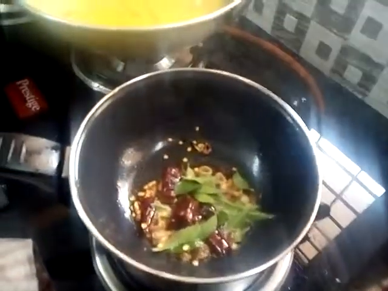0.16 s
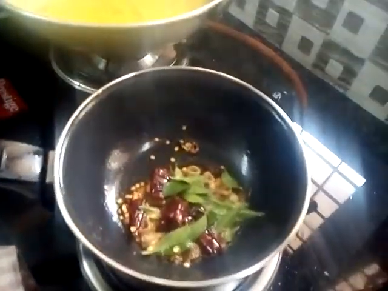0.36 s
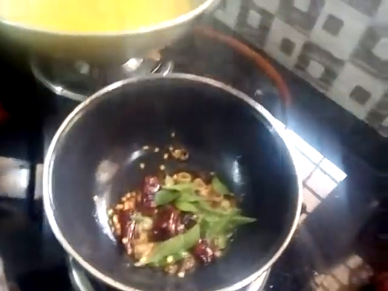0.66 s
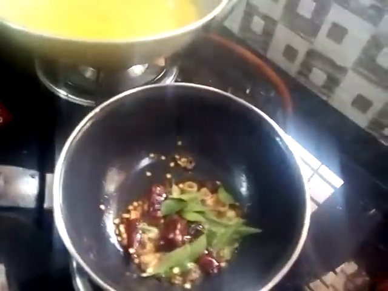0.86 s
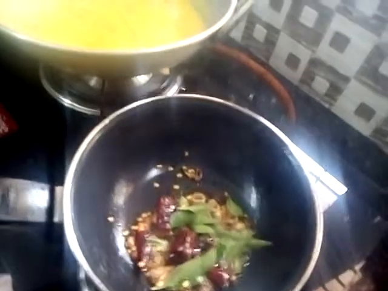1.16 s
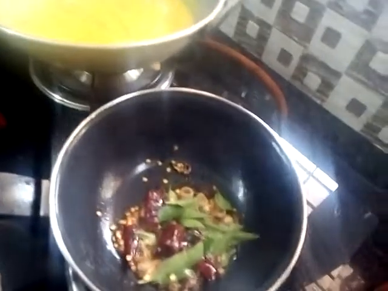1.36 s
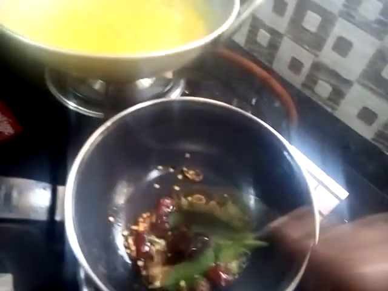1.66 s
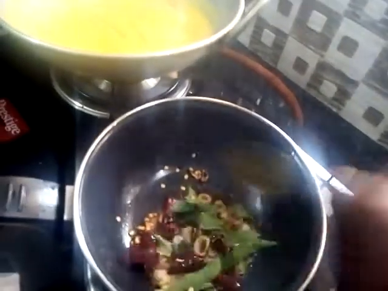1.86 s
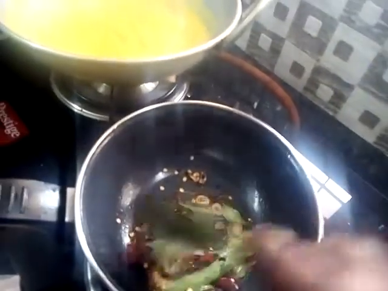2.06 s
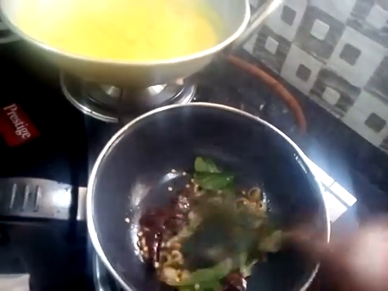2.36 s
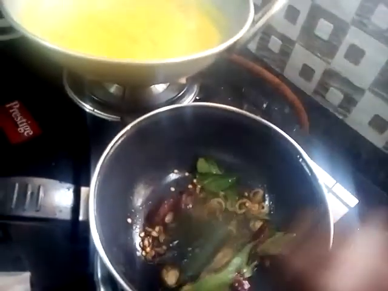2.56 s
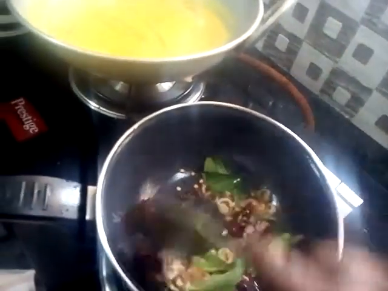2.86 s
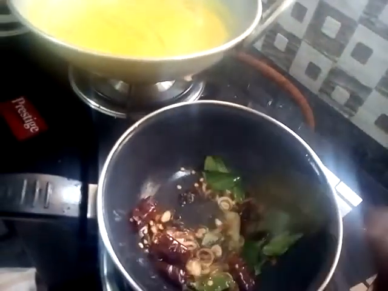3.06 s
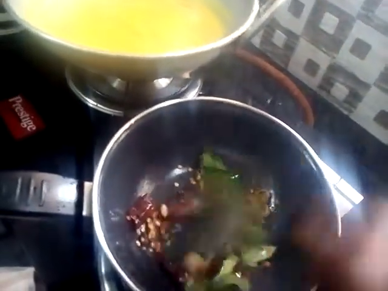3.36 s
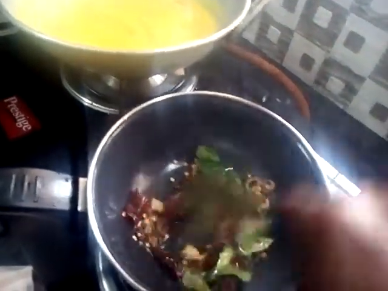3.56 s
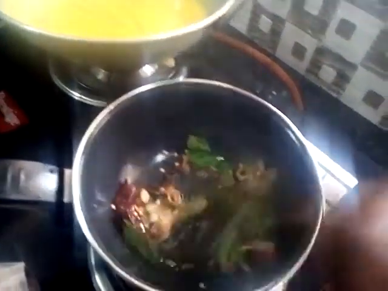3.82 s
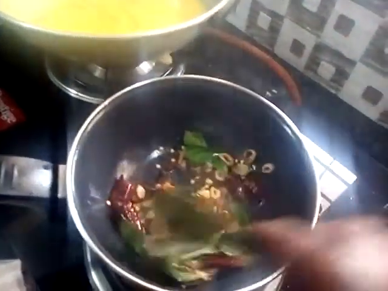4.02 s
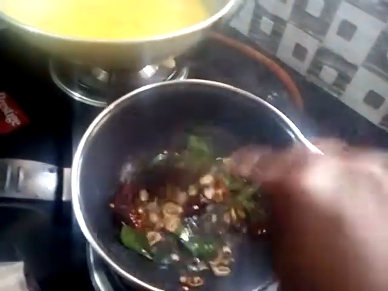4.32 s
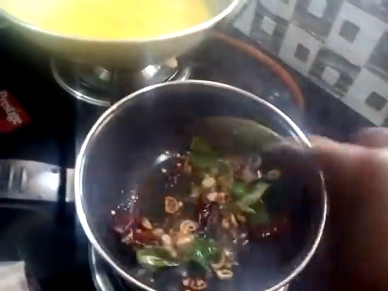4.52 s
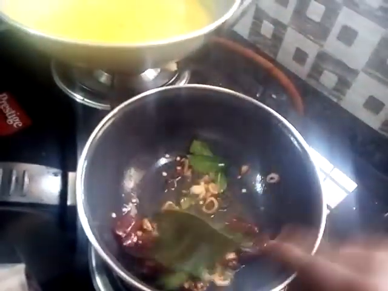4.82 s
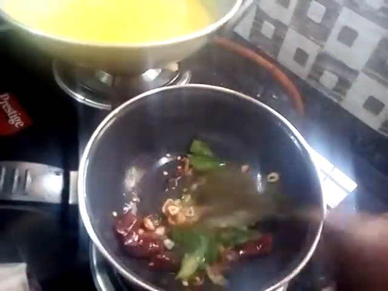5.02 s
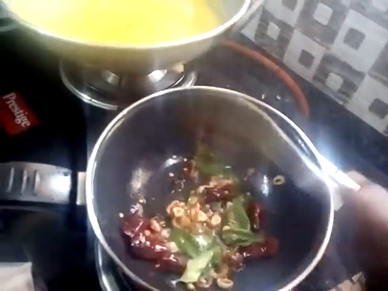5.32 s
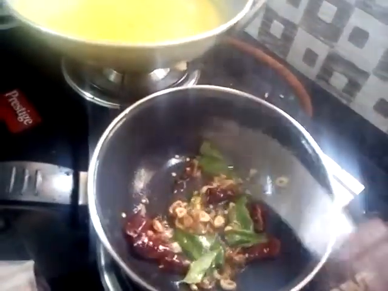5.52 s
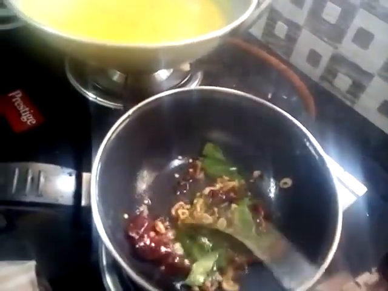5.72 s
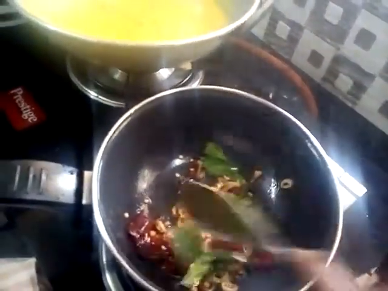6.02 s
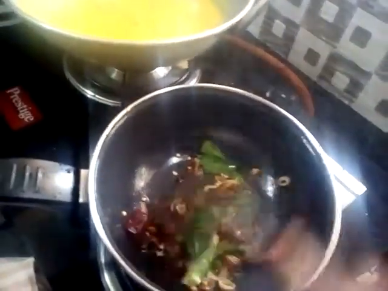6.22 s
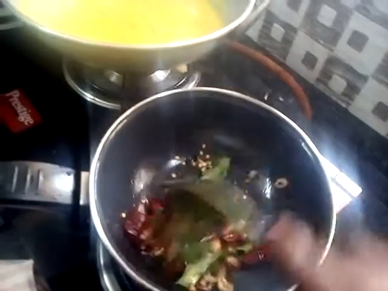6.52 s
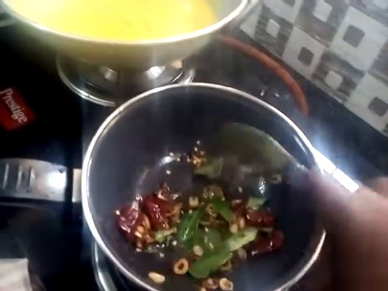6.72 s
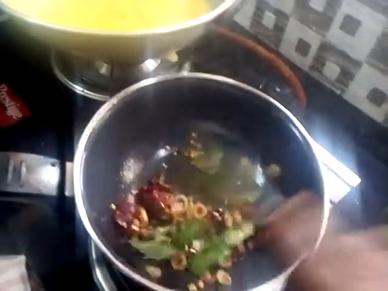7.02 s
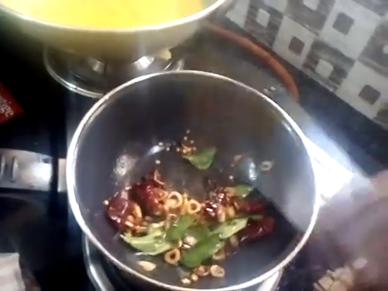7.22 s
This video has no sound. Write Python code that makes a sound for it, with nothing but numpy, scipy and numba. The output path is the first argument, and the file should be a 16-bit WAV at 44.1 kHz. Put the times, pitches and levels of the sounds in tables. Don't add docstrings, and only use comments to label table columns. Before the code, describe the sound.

A phone held just over a frying pan picks up quiet sizzling and low flame noise. A sharp crack and quickly fading steam hiss come first, with a small ringing tick after. Then irregular spoon scrapes, crunchy and dry, with hard clicks on the pan, dull pushes through the food and dense crackling of seeds. Stirring ends and the oil goes back to soft fizzing, with one late pop.

```python
import sys
import numpy as np
from scipy import signal
from scipy.fft import rfft, irfft, next_fast_len
from scipy.io import wavfile
from scipy.ndimage import uniform_filter1d, minimum_filter1d
from numba import njit

SR = 44100
rng = np.random.default_rng(int(sys.argv[2]) if len(sys.argv) > 2 else 0)


def int16_out(signal):
    q = np.round(np.clip(np.atleast_2d(signal).T, -1, 1) * 32767)
    wavfile.write(sys.argv[1], SR, q.astype(np.int16))


def field_ratio(decibels):
    return 10 ** (np.asarray(decibels, dtype=float) / 20)


N = 325458

# pitch_hz, level_db
KITCHEN_COLOUR = [(24, -60), (40, -27), (158, -5), (240, -9), (333, -1), (462, -4.5), (971, -2.5),
                  (3230, -7.5), (5330, 1), (5820, 1.5), (7400, -3), (9620, -36), (16300, -120)]
KITCHEN_DB = -54.5

# pitch_hz, level_db
CRACKLE_COLOUR = [(2500, -31.5), (3700, -6), (4700, -2.5), (5300, -2), (5820, 8.5), (6600, 6), (7300, 6),
                  (8000, -5.5)]
# pitch_hz, width_hz, level_db
PAN_MODES = [(997, 91, -10.5), (1680, 135, -2.5), (2050, 520, -2.5), (2570, 63, -26.5), (2890, 720, -1.5),
             (3438, 45, 2.5)]
# pitch_hz, width_hz, level_db
FOOD_MODES = [(173, 25, -1.5), (320.6, 40, 4), (563, 170, -3), (1040, 175, 7)]

# time_s, crackle_db
HEAT = [(0, -42.5), (.17, -51), (.46, -47.5), (.7, -54.5), (.77, -43), (.85, -56.5), (1.1, -53), (1.2, -49),
        (1.35, -49), (1.42, -79), (1.539, -51.5), (5.951, -57), (6.1, -48), (6.501, -51.5), (6.81, -48),
        (6.96, -52), (7.38, -64)]

# start_s, peak_db, pitch_hz, t60_s
KNOCKS = [(0.0, -36.5, 980, 0.51), (0.045, -46, 1040, 0.73), (0.208, -27.5, 2360, 0.038),
          (0.585, -34, 1600, 0.029), (0.804, -36, 1680, 0.089), (1.072, -42, 1790, 0.2),
          (1.071, -38, 2650, 0.093), (1.194, -38.5, 965, 0.18), (1.194, -36, 1700, 0.18),
          (1.843, -28.5, 1720, 0.11), (2.481, -32.5, 1820, 0.16), (2.745, -21, 2920, 0.043),
          (2.89, -29, 2050, 0.09), (3.278, -22.5, 1620, 0.087), (3.436, -20, 1730, 0.07),
          (3.685, -24, 1680, 0.061), (3.813, -28, 1920, 0.055), (3.932, -24.5, 2040, 0.1),
          (4.041, -34, 1910, 0.15), (4.073, -17, 1650, 0.08), (4.274, -30, 1850, 0.12),
          (4.785, -23, 1680, 0.096), (4.884, -27, 1920, 0.022), (4.98, -18, 1810, 0.024),
          (5.024, -20, 1630, 0.02), (5.126, -23.5, 1916, 0.11), (5.457, -28.5, 1960, 0.052),
          (5.74, -41, 1660, 0.052), (5.949, -34, 1820, 0.062), (6.459, -37.5, 2110, 0.15), ]
# start_s, peak_db, pitch_hz, t60_s
TINKS = [(0.391, -16, 4100, 0.07), (0.5855, -32.5, 3440, 0.22), (0.9426, -32, 4000, 0.029),
         (0.99, -25.5, 3700, 0.1), (4.105, -14, 4510, 0.15), (4.582, -26, 3350, 0.14),
         (4.276, -31, 2750, 0.13), (5.409, -31, 4240, 0.064), (5.4584, -13.5, 4370, 0.094),
         (5.578, -33, 3960, 0.064), (5.656, -36.5, 2890, 0.072), (5.7664, -32, 4140, 0.16),
         (5.824, -13.5, 4020, 0.11), (5.892, -20.5, 3400, 0.074), (6.401, -46, 3330, 0.35),
         (6.543, -34.5, 4170, 0.16), (6.829, -30, 4010, 0.071),]
# start_s, peak_db, pitch_hz, t60_s
VESSEL_RINGS = [
    (0, -38, 1500, 0.43),
    (0, -45.5, 2400, .5),
    (0, -33, 4800, 0.17),
    (4.5, -23, 3200, .08),
    (3, -32, 2000, .06),
]

# pitch_hz, level_db
JET_COLOUR = [(71, -65), (120, -30), (344, -14), (709, -15), (842, -12), (1960, -11.5), (2410, -7.5),
              (4050, -14.5), (5910, -1), (7400, -13), (9620, -44), (16300, -120)]
# pitch_hz, width_hz, level_db
JET_RINGS = [(322, 35, 6), (1770, 37, 2), (2450, 94, -5), (3030, 220, 1.5), (3700, 58, 5.5),
             (4370, 77, 7.5), (4820, 130, -9), (4940, 200, 1)]
JET_START_S, JET_END_S = 0.183, 0.43
JET_BURST_DB, JET_BURST_DB_S = -15, 136
JET_STREAM_DB, JET_STREAM_DB_S = -25.5, 33.5
JET_RELEASE_DB_S = 269

# start_s, peak_db, pitch_hz, tail_t60_s
POPS = [(0.182, 4.5, 4990, 0.11), (0.2114, 2, 5040, 0.083), (2.3088, -11, 6060, 0.058),
        (2.551, -11, 6380, 0.2), (2.592, -8, 6030, 0.26), (2.6087, -8, 6530, 0.025),
        (2.646, -3, 6020, 0.15), (2.72, -17, 6200, 0.052), (2.827, -15, 5850, 0.16),
        (2.891, -13.5, 6080, 0.06), (3.3171, -8, 6940, .042), (3.647, -6.5, 5850, 0.068),
        (3.928, -5, 7130, 0.25), (3.9716, -12, 5110, 0.24), (4.0761, -2, 6000, 0.06),
        (4.2389, -5.5, 6200, .03), (4.3087, -11.5, 5700, 0.078), (4.4209, -0.5, 6690, 0.033),
        (4.904, -10, 6050, 0.11), (4.9807, 3, 5850, 0.027), (5.0355, 1, 6180, 0.3),
        (5.125, -11, 6600, 0.12), (5.1956, -4.5, 6840, 0.029), (5.3808, -15.5, 7050, .16),
        (5.4603, -7.5, 6950, 0.18), (5.4821, -5.5, 6900, .035), (5.5147, -5.5, 6140, 0.16),
        (6.879, -9, 6270, 0.11)]
# start_s, peak_db, pitch_hz, pan_ring_relative_db
TAPS = [(0.391, -8.5, 5930, -18), (1.552, -14, 6130, -20), (1.577, -20, 3100, -18), (1.87, -14, 5840, -26),
        (2.0577, -19.5, 6140, -21), (2.424, -17.5, 5970, -17), (2.6304, -6.5, 6760, -16),
        (3.1097, -11, 6050, -21), (3.2791, -8.5, 4200, -11.5), (3.442, -14.5, 5700, -10),
        (3.6938, -13, 6450, -12), (3.71, -10.5, 6400, -18.5), (4.0441, -14, 5820, -14),
        (4.2051, -4.5, 6850, -30), (4.408, -13.5, 6300, -24), (4.6707, -24, 6850, -6.5),
        (4.7999, -0.5, 5910, -19.5), (4.8819, -13, 6000, -13.5), (5.0241, 1.5, 6100, -17),
        (5.8158, -19.5, 3750, -11), (5.862, -8.5, 6500, -28), (5.952, -13, 6250, -11),
        (5.976, -2, 6400, -23)]
# start_s, peak_db, pitch_hz
SPITS = [(0.0533, -27.5, 5400), (0.5307, -26, 6340), (0.656, -31.5, 5700), (1.221, -27.5, 6760),
         (1.294, -26.5, 6150), (1.343, -32.5, 5800), (1.5305, -29, 6100), (1.5964, -14, 6030),
         (1.679, -19.5, 5000), (1.719, -24.5, 7000), (2.141, -17, 6040), (2.1761, -19, 6300),
         (2.3433, -18.5, 6580), (2.997, -16.5, 5290), (3.1867, -24.5, 5730), (4.1068, -8, 5840),
         (4.3284, -18, 6150), (5.107, -7.5, 5560), (5.6105, -24, 6980), (5.647, -19, 6850),
         (6.222, -28.5, 5500), (6.651, -27.5, 6100), (6.749, -24, 6060), (6.803, -25.5, 5470),
         (7.2295, -24.5, 6030), (7.301, -30, 6600), (7.3453, -29, 4950)]
# start_s, peak_db, pitch_hz
TICKS_STIRRED = [(1.6208, -26, 6500), (1.8117, -36.5, 6980), (1.8617, -23, 6070), (1.9528, -29, 6900),
                 (1.9997, -37, 6630), (2.045, -24, 5940), (2.1249, -26, 6120), (2.1345, -28, 6100),
                 (2.188, -26, 5830), (2.1958, -22, 5940), (2.2624, -27, 5770), (2.267, -26.5, 6200),
                 (2.2925, -24, 6120), (2.3614, -23, 5770), (2.3778, -15.5, 5940), (2.4313, -17, 5860),
                 (2.4474, -25, 5770), (2.4823, -17, 5060), (2.56, -11, 5900), (2.599, -4, 6300),
                 (2.6052, -15, 5900), (2.6199, -15, 6030), (2.6816, -16.5, 5120), (2.7016, -19, 5810),
                 (2.708, -18.5, 5880), (2.7143, -22, 5810), (2.7345, -12, 5900), (2.7418, -19, 5770),
                 (2.7837, -20, 5720), (2.8133, -21.5, 5900), (2.837, -10.5, 6070), (2.896, -11, 6430),
                 (2.9011, -16.5, 5900), (2.9214, -23.5, 5920), (2.9453, -23, 5860), (3.021, -24, 4940),
                 (3.0488, -25.5, 6540), (3.079, -33, 5990), (3.1225, -19, 6450), (3.1428, -31, 5940),
                 (3.1455, -19.5, 5940), (3.1572, -21.5, 6500), (3.2912, -13, 4970), (3.34, -19.5, 7060),
                 (3.3539, -18, 5760), (3.4706, -30, 6330), (3.494, -25.5, 7060), (3.5038, -24, 5640),
                 (3.559, -25, 6600), (3.6213, -29.5, 6290), (3.628, -25, 5760), (3.6726, -13.5, 7040),
                 (3.6987, -15, 5900), (3.7255, -7, 5860), (3.7339, -9, 5670), (3.8036, -19, 5800),
                 (3.8224, -17, 5810), (3.8875, -25, 5680),
                 (3.9209, -22, 6250), (3.94, -9, 5830), (4.0306, -28, 5700), (4.0507, -17.5, 6290),
              (4.06, -19.5, 6120), (4.1517, -17, 6200), (4.1662, -18.5, 6240), (4.182, -19.5, 7090),
              (4.1933, -15.5, 6500), (4.218, -18.5, 5990), (4.2646, -12, 5800), (4.272, -17.5, 6030),
              (4.2777, -19, 7070), (4.2836, -17.5, 6250), (4.2975, -17.5, 6000), (4.3737, -26.5, 6900),
              (4.3808, -25, 4390), (4.4294, -12, 5990), (4.4354, -9, 6070), (4.4522, -19.5, 6150),
              (4.5058, -28, 6430), (4.6414, -27.5, 5600), (4.7164, -28, 6370), (4.7537, -21, 7170),
              (4.8201, -8.5, 5900), (4.8396, -18, 5470), (4.8863, -9.5, 5840), (4.9553, -6.5, 6020),
              (4.965, -15.5, 6160), (4.9893, -6.5, 6140), (4.9943, -7, 5940), (5.0541, -10.5, 5830),
              (5.0608, -10.5, 5730), (5.0801, -15.5, 5800), (5.1395, -7.5, 6610), (5.1499, -9.5, 6840),
              (5.1737, -16, 6600), (5.2177, -16, 6000), (5.227, -12.5, 6000), (5.2335, -20, 6020),
              (5.246, -17, 6060), (5.289, -29.5, 6660), (5.3388, -24, 6200), (5.5252, -6.5, 6060),
              (5.5485, -20, 5720), (5.6295, -36, 6680), (5.6864, -27, 6070), (5.7915, -27, 6360),
              (5.8104, -13.5, 6970), (5.8276, -11.5, 3520), (5.845, -14, 5430), (5.8704, -19, 5860),
              (5.882, -11, 7100), (5.8928, -15, 3400), (5.9002, -14, 5770), (5.921, -23, 5770),
              (5.9672, -13.5, 5770), (5.9904, -10, 6050)]
# start_s, peak_db, pitch_hz
TICKS_QUIET = [(0.0117, -33, 5680), (0.0841, -29, 6720), (0.1888, 0, 5420), (0.2197, -8, 5040),
               (0.2488, -13, 5730), (0.2553, -18, 6370), (0.2669, -17, 5250), (0.3586, -17, 6100),
               (0.4135, -20, 4130), (0.4224, -21, 6800), (0.4642, -32, 6040), (0.471, -28, 6720),
               (0.5656, -34, 6200), (0.617, -34, 6070), (0.718, -39, 5860), (0.742, -32, 5990),
               (0.908, -42, 5680), (0.9437, -33, 4090), (0.9897, -25.5, 3800), (1.1432, -42, 6680),
               (1.1718, -30.5, 6720), (1.192, -29, 6890), (1.2726, -30, 5990), (1.3493, -29.5, 5940),
               (6.0749, -35, 7020), (6.0915, -28, 7100), (6.117, -36, 6980), (6.1543, -31, 4780),
               (6.1917, -38, 6550), (6.2433, -32, 5510), (6.2687, -33, 6120), (6.3482, -29, 5940),
               (6.4008, -30, 6100), (6.44, -30, 5120), (6.513, -45, 6930), (6.5444, -35, 4310),
               (6.5797, -28.5, 5800), (6.6036, -30, 6760), (6.6358, -41, 6370), (6.6597, -30, 5940),
               (6.7935, -32, 5860), (6.8328, -35, 4090), (6.918, -23, 5800), (6.9674, -30.5, 6590),
               (7.0512, -34, 5650), (7.0812, -36, 6460), (7.0864, -30, 6460), (7.1494, -38, 6370),
               (7.21, -35, 6420), (7.246, -27.5, 5900)]
POP_RING_DB, SPIT_RING_DB, TICK_RING_DB = -34.5, -35, -25.5
TAP_T60_S, SPIT_T60_S, TICK_T60_S = 0.11, 0.062, 0.015
WALL_ECHO_S, WALL_ECHO_GAIN = 0.0010987, 0.6

# start_s, peak_db, pitch_hz, t60_s
THUMPS = [
    (3.44, -31, 1010, 0.09),
    (3.707, -35, 930, 0.1),
    (4.082, -41, 980, 0.25),
    (4.418, -39.5, 890, 0.11),
    (5.792, -37.5, 635, 0.36),
    (5.973, -37, 930, 0.084),
]
# start_s, length_s, crackle_db, pan_ring_relative_db
JABS = [(1.552, 0.15, -31, -7), (1.846, 0.078, -34.5, -10.5), (2.056, 0.32, -33.5, -14.5),
        (2.481, 0.035, -32, -12), (2.592, 0.07, -18.5, -12.5), (2.718, 0.015, -22, -17),
        (2.889, 0.033, -25.5, -19), (2.994, 0.087, -32.5, -14), (3.109, 0.021, -28.5, -16),
        (3.279, 0.034, -20, -10.5), (3.441, 0.079, -28.5, -10.5), (3.647, .03, -28, -14.5),
        (3.922, 0.031, -23, -18.5), (4.077, 0.052, -17, -12.5), (4.204, 0.11, -24, -11.5),
        (4.419, 0.0071, -17, -14.5), (4.796, 0.025, -24.5, -14.5), (4.873, 0.058, -22, -12),
        (4.953, 0.062, -21, -14), (5.022, 0.065, -21.5, -7), (5.197, 0.029, -22, -17.5),
        (5.461, 0.033, -24.5, -12), (5.513, 0.026, -28.5, -8.5), (5.952, 0.048, -27, -9.5),
        (6.881, 0.017, -29.5, -10.5)]
# start_s, length_s, crackle_db, pan_ring_relative_db
SWEEPS = [(2.2, 0.19, -34.5, -14.5), (2.41, 0.21, -34, -12), (2.67, .21, -31.5, -13),
          (3.0, 0.13, -47.5, -17), (3.16, 0.15, -40.5, -12), (3.5, 0.13, -42.5, -4.5),
          (3.675, 0.057, -23, -11), (3.79, 0.052, -31.5, -10), (3.955, 0.065, -31, -11),
          (4.035, 0.044, -28, -13.5), (4.25, 0.055, -27.5, -8), (4.34, 0.067, -38, -20),
          (4.46, 0.17, -46, -6.5), (4.655, 0.021, -29, -8), (4.73, 0.16, -33.5, -15),
          (5.085, 0.064, -24.5, -15.5), (5.25, 0.05, -55, -23), (5.57, 0.17, -49, -26),
          (5.79, 0.12, -26.5, -10)]
JAB_ATTACK_S, JAB_SAG_DB_S = 0.003, 79
SWEEP_ATTACK_S, SWEEP_SAG_DB_S = 0.031, -4
RELEASE_DB_S, AFTER_FIZZ_DB, AFTER_FIZZ_DB_S = 445, -11.5, 72
FIZZ_RINGS = 0.21

# pitch_hz, level_db
PHONE_CUT = [(7200, 0), (7500, -7), (7700, -10), (7810, -29), (8200, -44)]
# pitch_hz, level_db
PHONE_LEAK = [(8150, -50), (8290, -18), (8600, -29), (8800, -38), (9200, -90)]


def level(x, db):
    return x * field_ratio(db) / np.sqrt(np.mean(x ** 2))


def colour(x, points):
    hz, db = np.transpose(points)
    size = next_fast_len(len(x), real=True)
    f = np.maximum(np.arange(size // 2 + 1) * SR / size, 1)
    gain = field_ratio(np.interp(np.log(f), np.log(hz), db))
    return irfft(rfft(x, size) * gain, size)[:len(x)]


def highpass(x, order, hz):
    return signal.sosfilt(signal.butter(order, hz, "high", fs=SR, output="sos"), x)


def ring(x, hz, width_hz):
    return signal.lfilter(*signal.iirpeak(min(hz, 0.45 * SR), hz / width_hz, fs=SR), x)


def body(x, modes):
    out = 0
    for k, (hz, width_hz, db) in enumerate(modes):
        out = out + (-1) ** k * field_ratio(db) * ring(ring(x, hz, 2 * width_hz), hz, width_hz)
    return out


def decay(t, t60_s):
    return np.exp(-np.log(1000) * t / t60_s)


def walk(rate_hz):
    hold = int(SR / rate_hz)
    steps = np.repeat(rng.standard_normal(N // hold + 1), hold)
    return 1.25 * uniform_filter1d(steps, hold)[:N]


def patchy(x, patch_db, rate_hz):
    out = x
    for hz in np.arange(650, 7800, 450.0):
        out = out + (field_ratio(patch_db * walk(rate_hz)) - 1) * ring(x, hz, 330.0)
    return out


def grit(rate_hz, spread_db, burst_s, haze):
    when, size, noise = rng.random(N), rng.exponential(size=N), rng.standard_normal(N)
    starts = (when < rate_hz / SR) * field_ratio(spread_db * np.minimum(size, 4))
    puff = signal.lfilter([1], [1, -np.exp(-1 / (burst_s * SR))], starts)
    return level(noise * (puff / np.sqrt(np.mean(puff ** 2)) + haze), 0)


@njit
def bubbles(start, hz, t60, size):
    out = np.zeros(N)
    for k in range(len(start)):
        turn = np.exp(2j * np.pi * hz[k] / SR - np.log(1000) / (t60[k] * SR))
        z = size[k] + 0j
        for i in range(start[k], min(N, start[k] + int(t60[k] * SR))):
            out[i] += z.imag
            z *= turn
    return out


def fizz(low_hz, high_hz, cycles, spread_db, count):
    when, pitch, life = rng.random((count, 3)).T
    hz = low_hz * (high_hz / low_hz) ** pitch
    size = field_ratio(spread_db * np.minimum(rng.exponential(size=count), 4))
    t60_s = cycles * (0.63 + life) / hz
    return level(bubbles((when * N).astype(np.int64), hz, t60_s, size), 0)


def add(track, s, sound):
    i = int(s * SR)
    track[i:i + len(sound)] += sound[:N - i]


def kitchen():
    air = patchy(colour(rng.standard_normal(N), KITCHEN_COLOUR), 3.0, 14.0)
    return level(air * field_ratio(0.7 * walk(9)), KITCHEN_DB)


def simmer(crackle_db):
    small = colour(fizz(3500.0, 7600.0, 45.0, 2.2, count=4000), CRACKLE_COLOUR)
    small = level(small * field_ratio(2.2 * walk(20)), -2.0)
    ticks = ring(ring(grit(50.0, 3.7, 0.00035, 0.0), 5500.0, 6000.0), 5500.0, 7000.0)
    large = fizz(1500.0, 5000.0, 30.0, 2.0, count=2000) * field_ratio(2.5 * walk(8))
    return field_ratio(crackle_db) * (small + level(ticks, -8.5)) + field_ratio(-64.0) * large


def knocks():
    out = np.zeros(N)
    t = np.arange(SR // 6) / SR
    rows = KNOCKS + TINKS + VESSEL_RINGS
    noise = rng.standard_normal((len(rows), len(t)))
    for (s, db, hz, t60), n in zip(rows, noise):
        tone = 0.16 * np.sin(2 * np.pi * hz * t)
        rough = ring(ring(n, hz, 280.0), hz, 410.0)
        push = 0.3 * ring(n, hz, 1400.0) * np.exp(-t / 0.0037)
        sound = (tone + rough + push) * decay(t, max(t60, 0.005))
        add(out, s, field_ratio(db - 3.5) * sound / np.abs(sound).max())
    return out


def steam():
    t = np.arange(N) / SR
    since = np.maximum(t - JET_START_S, 0)
    burst = field_ratio(JET_BURST_DB - JET_BURST_DB_S * since) ** 2
    stream = field_ratio(JET_STREAM_DB - JET_STREAM_DB_S * since) ** 2
    db = 10 * np.log10(burst + stream) - JET_RELEASE_DB_S * np.maximum(t - JET_END_S, 0)
    return np.where(t >= JET_START_S, db, -120)


def jet(db):
    rush = colour(grit(580.0, 0.85, 0.0027, 5.2), JET_COLOUR)
    rings = sum(field_ratio(gain_db) * ring(rush, hz, width_hz) for hz, width_hz, gain_db in JET_RINGS)
    return field_ratio(db) * level(rush + rings, -0.5)


def pops():
    out, push = np.zeros(N), np.zeros(N)
    t = np.arange(SR // 8) / SR
    rows = [(s, db, hz, POP_RING_DB, t60) for s, db, hz, t60 in POPS]
    rows += [(*row, TAP_T60_S) for row in TAPS]
    rows += [(*row, SPIT_RING_DB, SPIT_T60_S) for row in SPITS]
    rows += [(*row, TICK_RING_DB, TICK_T60_S) for row in TICKS_STIRRED + TICKS_QUIET]
    noise = rng.standard_normal((len(rows), len(t)))
    for (s, db, hz, ring_db, t60), n in zip(rows, noise):
        crack = np.sign(n) * np.exp(-t / 0.00018)
        tail = n * decay(t, max(t60, 0.005))
        snap = np.sin(2 * np.pi * hz * t) * np.exp(-t / 0.0009)
        pitched = snap + 1.08 * ring(crack, hz, 4400.0)
        ringing = ring(tail, hz, 250.0) + 0.52 * ring(tail, 5600.0, 1700.0)
        add(out, s, field_ratio(db) * (pitched / np.abs(pitched).max() + 0.33 * ringing))
        add(push, s, field_ratio(db + ring_db) * (crack / np.sqrt(np.sum(crack ** 2)) + 0.035 * tail))
    return field_ratio(-1.0) * highpass(out, 3, 2400) + field_ratio(27.5) * body(push, PAN_MODES)


def wall_echo(cracks):
    return cracks + WALL_ECHO_GAIN * np.roll(cracks, int(WALL_ECHO_S * SR))


def thumps():
    out = np.zeros(N)
    t = np.arange(SR // 4) / SR
    noise = rng.standard_normal((len(THUMPS), len(t)))
    for (s, db, hz, t60), n in zip(THUMPS, noise):
        push = n * (1 - np.exp(-t / 0.0057)) * decay(t, max(t60, 0.01))
        add(out, s, field_ratio(db + 9.5) * (body(push, FOOD_MODES) + 1.16 * ring(push, hz, 190.0)))
    return out


def strokes(rows, attack_s, sag_db_s):
    t = np.arange(0, N, 16) / SR
    crackle, pan = np.zeros(len(t)), np.zeros(len(t))
    for s, length, db, ring_db in rows:
        since, after = np.maximum(t - s, 0), np.maximum(t - s - length, 0)
        attack = np.minimum(since / max(attack_s, 0.001), 1)
        held = (attack * field_ratio(db - sag_db_s * (since - after))) ** 2
        scrape = field_ratio(-RELEASE_DB_S * after) ** 2
        linger = field_ratio(AFTER_FIZZ_DB - AFTER_FIZZ_DB_S * after) ** 2
        crackle = crackle + held * (scrape + linger)
        pan = pan + held * field_ratio(ring_db) ** 2 * (scrape + FIZZ_RINGS * linger)
    return np.array([np.interp(np.arange(N) / SR, t, power) for power in (crackle, pan)])


def spoon():
    jabs = strokes(JABS, JAB_ATTACK_S, JAB_SAG_DB_S)
    sweeps = strokes(SWEEPS, SWEEP_ATTACK_S, SWEEP_SAG_DB_S)
    crackle, pan = jabs + sweeps + 1e-14
    return 10 * np.log10(crackle), 10 * np.log10(pan / crackle)


def pan_wall(bursts):
    wall = level(sum(field_ratio(3.0 * walk(14)) * body(bursts, [mode]) for mode in PAN_MODES), 0)
    broad = level(ring(ring(bursts, 3400.0, 1900.0), 3500.0, 2100.0), -12.0)
    narrow = level(ring(bursts, 4020.0, 160.0), -2.9)
    large_bubbles = level(fizz(1630.0, 4200.0, 30.0, 4.5, count=2500), -9.5)
    return level(wall + broad + narrow, -3.0) + large_bubbles


def stirring(crackle_db, ring_db):
    bursts = grit(650.0, 1.5, 0.0007, 1.1)
    bright = bursts + 0.29 * fizz(3480.0, 7440.0, 20.0, 3.0, count=4000)
    crackle = level(colour(bright, CRACKLE_COLOUR), -4.5)
    crackle = crackle + 2.75 * ring(crackle, 5006.0, 170.0)
    crackle = crackle + 0.52 * ring(crackle, 5880.0, 180.0)
    crackle = patchy(crackle, 3.38, 30.0) * field_ratio(0.42 * walk(40))
    thud = body(0.26 * bursts + rng.standard_normal(N), FOOD_MODES) * field_ratio(3.2 * walk(27.0))
    through_pan = pan_wall(bursts) + level(thud, -20.0)
    return field_ratio(crackle_db) * (crackle + field_ratio(ring_db) * through_pan)


def scene():
    heat_db = np.interp(np.arange(N) / SR, *np.transpose(HEAT))
    oil = simmer(heat_db) + jet(steam())
    cracks = wall_echo(pops())
    stirred = highpass(stirring(*spoon()) + thumps(), 2 + 1, 140)
    return (kitchen() + oil + knocks() + cracks + stirred)[None]


def top_cut(x):
    return signal.sosfilt(signal.butter(12, 8800, fs=SR, output="sos"), x)


def record(dry):
    x = highpass(dry[0], 1, 30)
    carrier = np.cos(2 * np.pi * 16000 * np.arange(N) / SR)
    mirror = colour(x, [(7900, 0), (8000, -90)]) * carrier
    x = (colour(x, PHONE_CUT) + colour(mirror, PHONE_LEAK))[None]
    duck = minimum_filter1d(np.minimum(1, 0.98 / (np.abs(x) + 1e-9)), size=96)
    duck = uniform_filter1d(uniform_filter1d(duck, size=48), size=48)
    mix = x - highpass(x * (1 - duck), 2, 200)
    return top_cut(mix)


dry = scene()
out = record(dry)
int16_out(out)
```